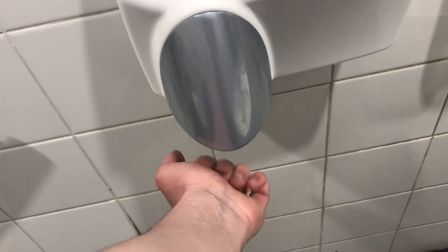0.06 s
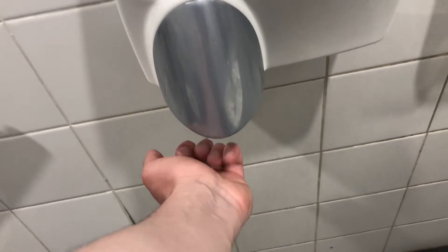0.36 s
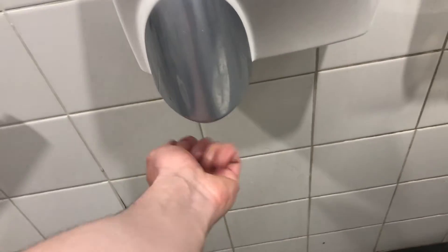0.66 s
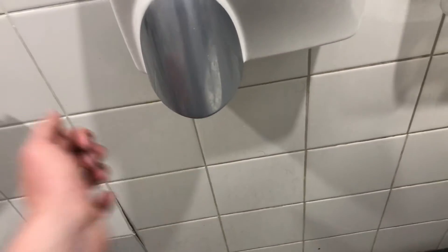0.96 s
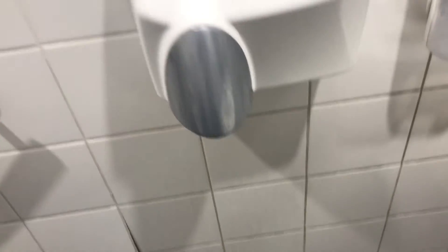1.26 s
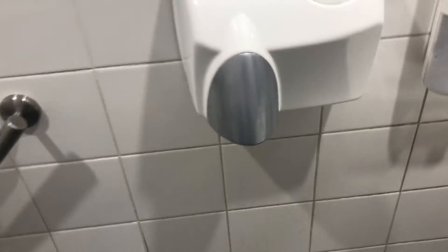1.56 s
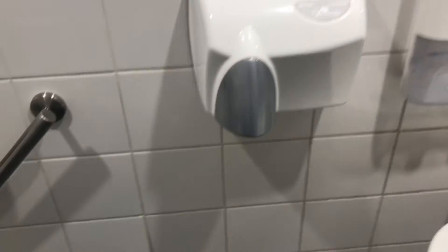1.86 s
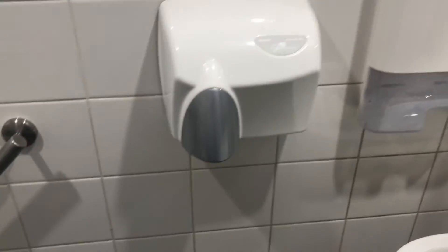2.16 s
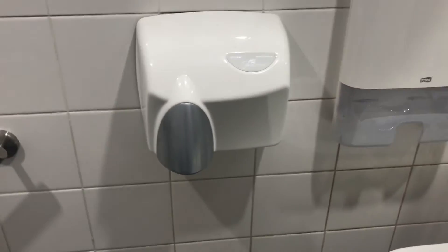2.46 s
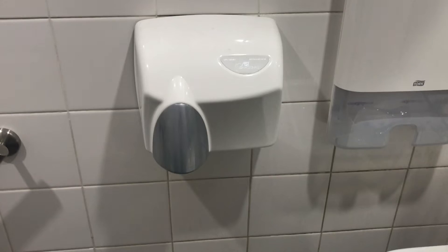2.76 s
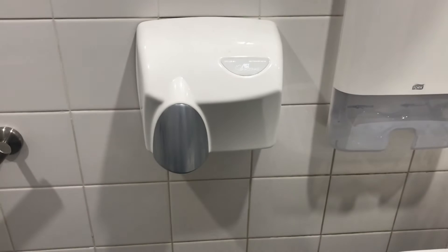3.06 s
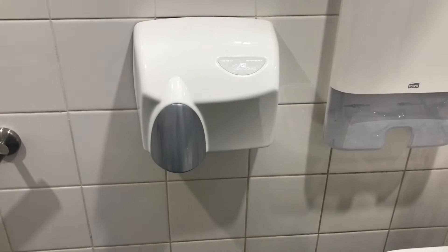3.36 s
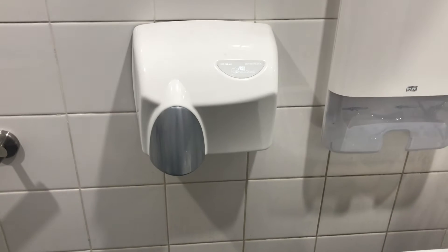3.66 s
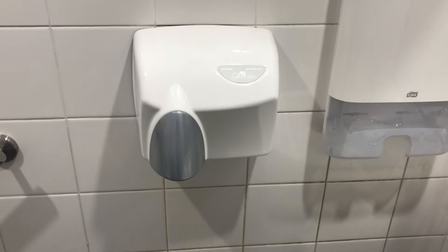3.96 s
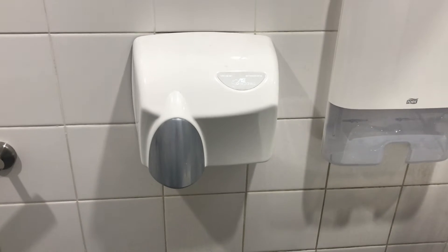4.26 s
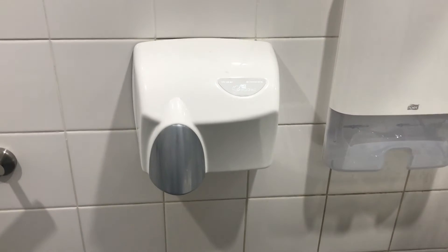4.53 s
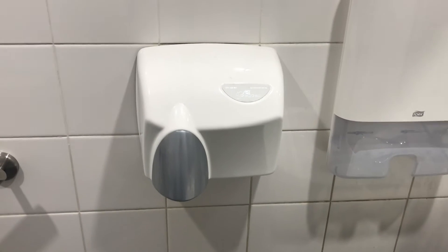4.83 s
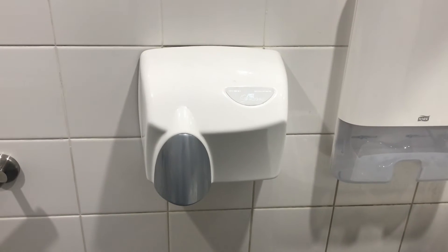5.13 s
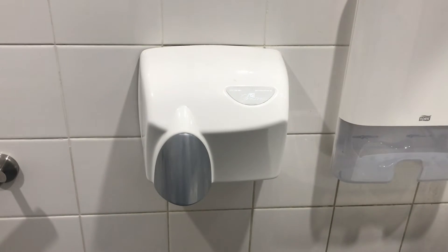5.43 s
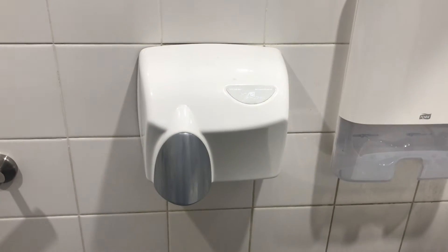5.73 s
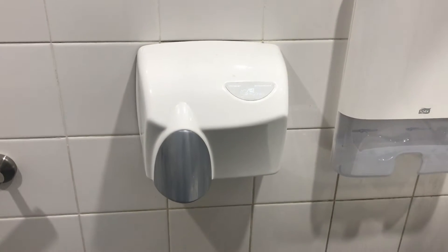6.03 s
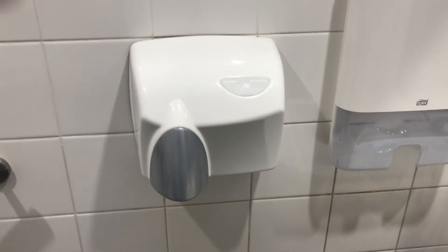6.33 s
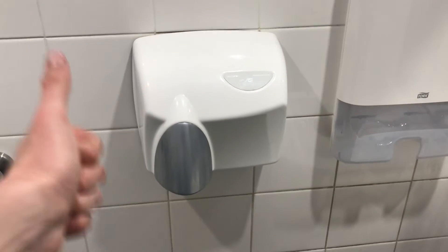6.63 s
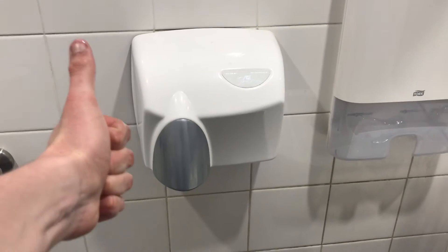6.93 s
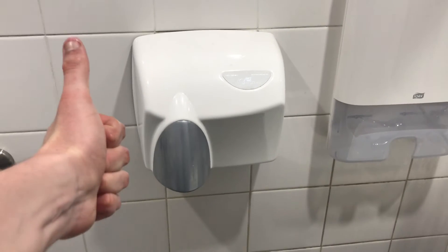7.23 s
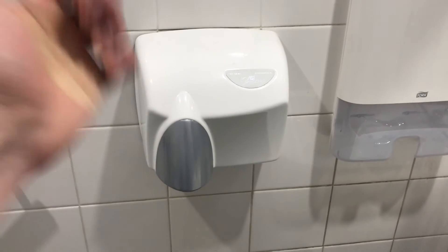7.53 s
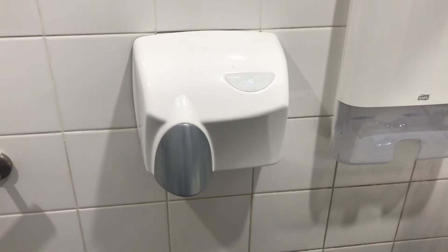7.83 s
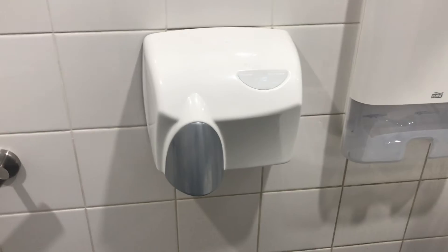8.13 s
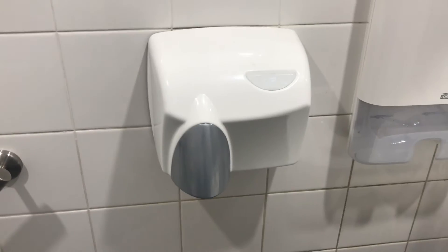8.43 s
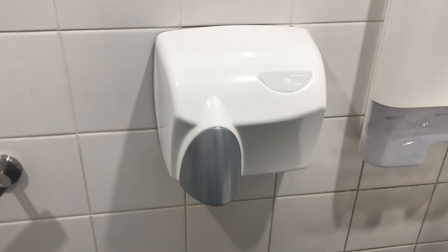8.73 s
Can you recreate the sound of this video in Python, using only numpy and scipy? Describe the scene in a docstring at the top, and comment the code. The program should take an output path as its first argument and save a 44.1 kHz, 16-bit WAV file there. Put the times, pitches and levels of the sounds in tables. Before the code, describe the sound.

An electric hand dryer blows loudly, shuts off with a sinking whine, and leaves a humming fan and faint hand rustles.

```python
"""A wall hand dryer roars near a mono microphone in a small tiled washroom, over an extractor fan's drone.
For the first second a hand buffets the turbulent jet; at 1.7 s the microphone starts to back away.
Near 5 s the motor cuts out and the blower coasts: the jet's hiss fades first and the whine sinks.
A faint high hiss lingers as the blower stops; a moving hand rustles and ticks, and the fan drones on."""
import sys
import numpy as np
from scipy import signal
from scipy.fft import rfft, irfft, next_fast_len
from scipy.io import wavfile
from scipy.ndimage import uniform_filter1d

SR = 44100
rng = np.random.default_rng(int(sys.argv[2]) if len(sys.argv) > 2 else 0)


def log_audio(samples):
    """Write samples as a 16-bit WAV file to the path given in sys.argv[1]."""
    # one column per channel
    frames = np.atleast_2d(samples).T
    # limit to full scale, then quantise
    limited = np.clip(frames, -1, 1)
    pcm = np.round(limited * 32767).astype(np.int16)
    wavfile.write(sys.argv[1], SR, pcm)


N = 387638
BACK_AWAY_S, BACKING_S = 1.7, 0.29  # start and length of the microphone's retreat
CUT_OUT_S = 4.923  # the dryer's motor switches off


def amp(db):
    """Amplitude grows tenfold for every 20 dB."""
    return 10 ** (np.asarray(db) / 20)


def ramp(t, start_s, length_s):
    """Linear transition from 0 to 1."""
    return np.clip((t - start_s) / length_s, 0, 1)


def spectrum_at(points, hz):
    """Spectral envelope, interpolated on a logarithmic frequency axis."""
    point_hz, values = np.transpose(points)
    return np.interp(np.log(hz + 1), np.log(point_hz + 1), values)


def resonance_db(modes, hz):
    """Each resonance adds a Lorentzian peak or notch to the response in dB."""
    return sum(db / (1 + (2 * (hz - centre) / width) ** 2) for centre, width, db in modes)


def resonate(x, modes):
    """Linear filtering: the spectrum is multiplied by the response of the resonances."""
    size = next_fast_len(N + SR, real=True)
    response = amp(resonance_db(modes, np.fft.rfftfreq(size, 1 / SR)))
    return irfft(rfft(x, size) * response, size)[..., :N]


def white_spectra(size):
    """White noise has equal power per hertz, here 0 dB: returns hz (a column), t, short-time spectra."""
    noise = rng.standard_normal(N) * np.sqrt(SR / 2)
    hz, t, spectra = signal.stft(noise, SR, nperseg=size, noverlap=size - size // 4)
    return hz[:, None], t, spectra


def overlap_add(spectra):
    """Overlapping short-time frames sum to a waveform."""
    size = 2 * (len(spectra) - 1)
    return signal.istft(spectra, nperseg=size, noverlap=size - size // 4)[1][:N]


def patches(shape, bins, frames):
    """Local averaging turns noise into a smooth random field, scaled to unit deviation."""
    field = rng.standard_normal(shape)
    for axis, size in enumerate((bins, frames)):
        field = uniform_filter1d(field, size, axis, mode="wrap")
    return field / field.std()


def whistle(pitch_hz, width_hz, rough):
    """Turbulence modulates a 0 dB tone, moving the share rough of its power into sidebands."""
    t = np.arange(N) / SR
    slow_t = np.linspace(0, t[-1], 4096)
    band = np.exp(-(2 * np.fft.rfftfreq(len(slow_t), slow_t[1]) / width_hz) ** 2)
    flutter = irfft(rfft(rng.standard_normal((2, len(slow_t)))) * band)
    flutter = np.sqrt(rough / 2) * flutter / flutter.std()
    in_phase, quadrature = (np.interp(t, slow_t, row) for row in flutter)
    phase = 2 * np.pi * np.cumsum(pitch_hz * np.ones(N)) / SR
    return np.sqrt(2) * ((np.sqrt(1 - rough) + in_phase) * np.cos(phase) + quadrature * np.sin(phase))


def extractor_rush(ripple_db=1.0):
    """Duct resonances colour the extractor fan's steady flow noise; thin tones sound above it."""
    # dull rush of air: frequency_hz, density_db_per_hz
    airflow = [(25.0, -75), (50.0, -66), (130.0, -76.5), (200.0, -73), (330.0, -83.5), (480.0, -88),
               (700.0, -86), (1000.0, -88.0), (1400.0, -90.2), (2600.0, -97), (4300.0, -103.0),
               (6300.0, -107.5), (8000.0, -113.0), (15500.0, -117.8)]
    # duct resonances: centre_hz, width_hz, gain_db
    duct_modes = [(580, 18, 7.5), (636, 30, 1), (704, 25, 4.5), (750, 45, 5), (1146, 14, 5), (1900, 8, -2)]
    # thin tones of the fan: pitch_hz, level_db
    fan_tones = [(635, -64), (1394, -70.5), (2545, -80), (2795, -83)]
    hz, _, noise = white_spectra(size=8192)
    comb_db = ripple_db * patches(noise.shape, bins=2, frames=60)
    rush = overlap_add(noise * amp(spectrum_at(airflow, hz) + resonance_db(duct_modes, hz) + comb_db))
    return rush + sum(amp(db) * whistle(pitch, width_hz=7.3, rough=0.31) for pitch, db in fan_tones)


def beating_hum(fan_hz=96.92, mains_hz=100.01, fan_gain_db=0.4, side_tones_db=-19, waver_db=0.7):
    """Beats: the fan motor slips behind the mains, so their hums interfere three times a second."""
    # contour of the extractor fan's hum: time_s, level_db
    fan_contour = [(0.1, -37.1), (1.2, -39.0), (2.5, -45), (4.7, -46), (5.4, -42), (8.25, -43),
                   (8.55, -40.2)]
    t = np.arange(N) / SR
    waver = signal.resample(rng.standard_normal(64), N)
    fan_db = fan_gain_db + np.interp(t, *np.transpose(fan_contour)) + waver_db * waver
    phase = 2 * np.pi * fan_hz * t
    shaft, octave = np.sin(phase / 2), np.sin(2 * phase)
    fan = np.sin(phase) + amp(side_tones_db) * (shaft + octave)
    # the mains hum is louder while the dryer runs, and louder still close to it
    on_db, off_db, near_lift_db = -55, -63, 3
    mains_db = on_db + (off_db - on_db) * ramp(t, CUT_OUT_S, length_s=0.56)
    mains_db += near_lift_db * (1 - ramp(t, BACK_AWAY_S, BACKING_S))
    mains = np.sin(2 * np.pi * (mains_hz * t + rng.random()))
    return np.sqrt(2) * (amp(fan_db) * fan + amp(mains_db) * mains)


def rustles_and_hiss(echo_db=-12, room_t60_s=0.45):
    """Reverberation: each bright burst of noise leaves a faint, exponentially decaying tail."""
    # a hand's rustles and ticks, and a faint high hiss lingering as the blower stops:
    # peak_s, spread_s, density_db_per_hz, centre_hz, spread_octaves
    bursts = [(6.252, .003, -107, 11000, 1.2), (6.45, 0.17, -118, 11000, .6), (6.66, .03, -119, 12000, .5),
              (7.02, .04, -110, 6000, .3), (7.52, 0.027, -115, 10000, 1), (7.575, .018, -106, 14000, .22),
              (7.608, 0.0023, -99, 6000, 0.72), (7.885, .012, -114, 11000, .8)]
    hz, t, noise = white_spectra(size=256)
    gain = 0
    for peak_s, spread_s, db, centre_hz, octaves in bursts:
        burst = np.exp(-0.5 * ((t - peak_s) / spread_s) ** 2)
        tail = (t > peak_s) * amp(echo_db) * np.exp(-np.log(1000) * abs(t - peak_s) / room_t60_s)
        band = np.exp(-0.5 * (np.log2((hz + 1) / centre_hz) / octaves) ** 2)
        gain += amp(db) * np.maximum(burst, tail) * band
    return overlap_add(noise * gain)


def coasting_db(t, fade_db_per_s, stall_s=6.3, stall_db_per_s=45):
    """Exponential decay after the cut-out, steeper once friction stops the blower's last turns."""
    return -fade_db_per_s * np.maximum(t - CUT_OUT_S, 0) - stall_db_per_s * np.maximum(t - stall_s, 0)


def hand_in_jet(t):
    """Obstruction of the flow: 1 with the hand under the nozzle, 0 once it is drawn out."""
    return 1 - ramp(t, start_s=0.67, length_s=0.5)


def blower_whine(running_hz=3141, lift_hz=26.05, sag_hz_per_s=900, near_db=-40, far_db=-43.5):
    """A blade tone follows rotor speed: higher while the hand blocks the jet, sinking after cut-out."""
    t = np.arange(N) / SR
    pitch_hz = running_hz + lift_hz * hand_in_jet(t) - sag_hz_per_s * np.maximum(t - CUT_OUT_S, 0)
    level_db = near_db + (far_db - near_db) * ramp(t, BACK_AWAY_S, length_s=2.2)
    level_db += coasting_db(t, fade_db_per_s=60)
    return amp(level_db) * whistle(pitch_hz, width_hz=20, rough=0.44)


def air_path_tones():
    """Flow excites tones in the dryer; their balance varies with position, and each has its own decay."""
    # drone, hoots and whistles of duct and housing:
    # pitch_hz, near_db, far_db, fade_db_per_s, width_hz, rough_share
    tones = [(278.5, -39, -55, 2, 24, 0.64), (453.6, -58, -47.5, 25, 12, .5),
             (590.3, -50, -35.5, 16, 17, .36), (815, -45.5, -39.5, 21, 22, .85),
             (1156, -40, -42, 13.5, 45, 0.9), (2712, -55, -47, 27, 24, .6), (5030, -46, -55, 14, 80, .95)]
    t = np.arange(N) / SR
    away = ramp(t, BACK_AWAY_S, BACKING_S)
    mix = 0
    for pitch_hz, near_db, far_db, fade_db_per_s, width_hz, rough in tones:
        level_db = near_db + away * (far_db - near_db) + coasting_db(t, fade_db_per_s)
        mix += amp(level_db) * whistle(pitch_hz, width_hz, rough)
    return mix


def dryer_jet(ripple_db=2.0, eddy_db=0.5, hiss_drop_db=17.5, hiss_drop_s=0.62):
    """Turbulence radiates broadband noise through the housing; it darkens and fades as the flow slows."""
    # turbulence at full speed: frequency_hz, density_db_per_hz
    turbulence = [(25.0, -94), (80.0, -75), (130.0, -72.5), (230.0, -59), (400.0, -63.5), (510.0, -66),
                  (750.0, -54.5), (1100.0, -54.0), (1350.0, -60.5), (2100.0, -63), (2800.0, -62.5),
                  (4200.0, -65.5), (7000.0, -70), (15500.0, -80.5)]
    # resonances of housing, nozzle and tiled corner: centre_hz, width_hz, gain_db
    housing_modes = [(149, 19, 3), (194, 10, 6.5), (206, 9.9, -8.5), (221.8, 6.4, 3.5), (241, 8.2, 4),
                     (386, 21, 7.5), (570, 42, 3.5), (648, 44, 4), (885, 160, 3.6), (1045, 14, 5),
                     (1152, 61, 3), (1476, 190, 3), (1653, 64, 3.5), (1780, 39, 8), (2465, 270, 2.5),
                     (2700, 45, 2), (2830, 640, 6.5), (3120, 110, 0.5), (3450, 90, 0.5), (3758, 34, 2),
                     (4110, 210, 3.5), (9288, 1900, 0.5)]
    # colour of the jet striking an obstacle: frequency_hz, gain_db
    buffet = [(40, 2), (75, 14), (130, 5.5), (200, 1.5), (330, 9), (450, 2.5), (520, 5.5), (720, -4),
              (1000, 0), (2000, -2), (4000, 1), (15000, 1.5)]
    # brief flares of the jet's hiss, the early ones off the fingers: peak_s, spread_s, gain_db
    gusts = [(.185, .035, 6), (.35, .045, 4.5), (0.716, 0.042, 5.5), (1.73, .02, 5)]
    # how far a band follows the hiss (below 0 it outlasts the roar): frequency_hz, hiss_share
    hiss_shares = [(60, -0.59), (250, -0.45), (600, -0.093), (1000, -0.022), (2000, 0.056), (3000, 0.39),
                   (4300, 0.6), (5200, 0.17), (6300, 0.65), (8000, 0.94), (15000, 0.99)]
    hz, t, noise = white_spectra(size=4096)
    hand = hand_in_jet(t)

    # the hand lifts roar and hiss slightly; the hiss dies first as the jet collapses
    collapse = 1 - np.exp(-np.maximum(t - CUT_OUT_S, 0) / hiss_drop_s)
    roar_db = 1.0 * hand
    hiss_db = 0.5 * hand - hiss_drop_db * collapse
    share = spectrum_at(hiss_shares, hz)
    flow_db = coasting_db(t, fade_db_per_s=24) + (1 - share) * roar_db + share * hiss_db

    # with the hand gone, the wall below still causes some buffeting
    wall_weight, hand_weight = 0.27, 1.15
    buffet_db = (wall_weight + hand * (hand_weight - wall_weight)) * spectrum_at(buffet, hz)
    flare_hz, flare_width_hz, flare_rest_db = 2900, 700, -4.0
    gust_db = sum(db * np.exp(-0.5 * ((t - peak_s) / spread_s) ** 2) for peak_s, spread_s, db in gusts)
    flare_db = resonance_db([(flare_hz, flare_width_hz, flare_rest_db + gust_db)], hz)
    colour_db = spectrum_at(turbulence, hz) + resonance_db(housing_modes, hz) + buffet_db + flare_db

    # reflections off the tiles interfere in a fine comb that drifts as the microphone moves
    comb_db = ripple_db * hz / (hz + 200) * patches(noise.shape, bins=2, frames=60)
    flicker_db = eddy_db * patches(noise.shape, bins=200, frames=4)
    return overlap_add(noise * amp(flow_db + colour_db + comb_db + flicker_db))


def scene():
    """Superposition: all sources sum at one point, coloured by room modes, alike on both channels."""
    # low standing waves of the washroom: centre_hz, width_hz, gain_db
    room_modes = [(35, 13, -7.5), (48, 7, 0.5), (63, 16.4, -8.5), (76, 4.1, 11.5)]
    dryer = dryer_jet() + air_path_tones() + blower_whine()
    mix = resonate(dryer + extractor_rush() + beating_hum() + rustles_and_hiss(), room_modes)
    return np.array([mix, mix])


def record(dry):
    """The microphone port notches the treble, then a low-pass filter limits the bandwidth."""
    # notches of the port: centre_hz, width_hz, gain_db
    port_notches = [(5000, 440, -3.5), (7600, 700, -3.5), (10440, 450, -5.5)]
    low_pass = signal.firwin(601, cutoff=15800, window=("kaiser", 9), fs=SR)
    return signal.oaconvolve(resonate(dry, port_notches), low_pass[None], "same")


dry = scene()
out = record(dry)
log_audio(out)
```